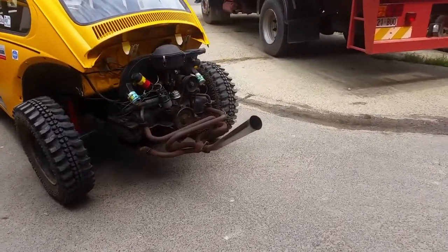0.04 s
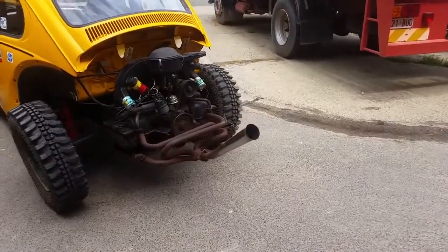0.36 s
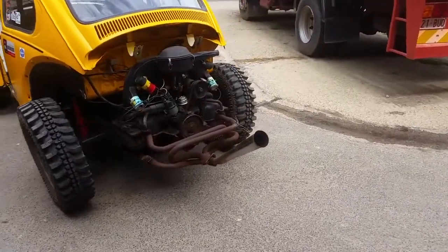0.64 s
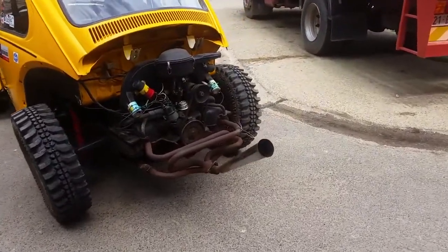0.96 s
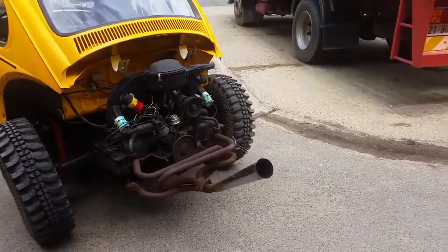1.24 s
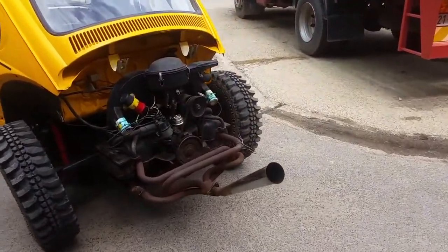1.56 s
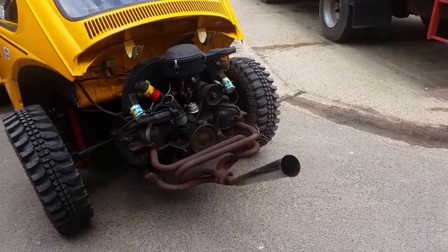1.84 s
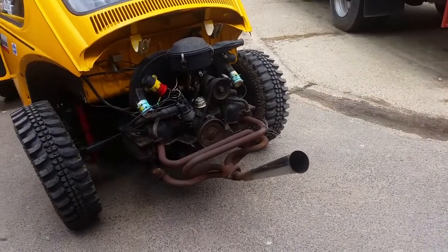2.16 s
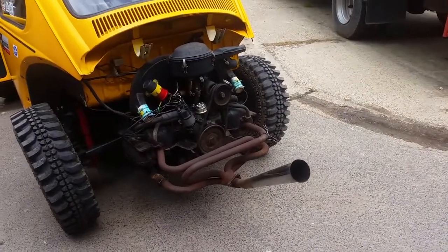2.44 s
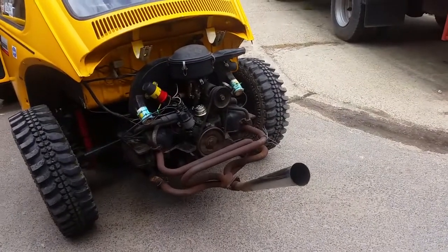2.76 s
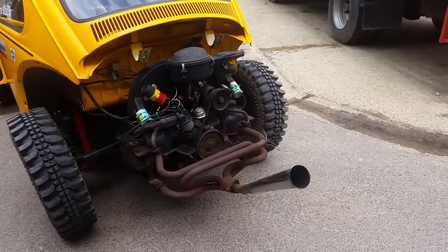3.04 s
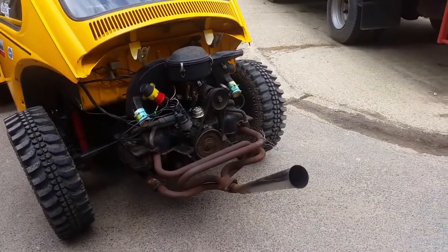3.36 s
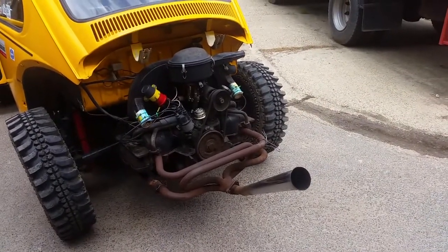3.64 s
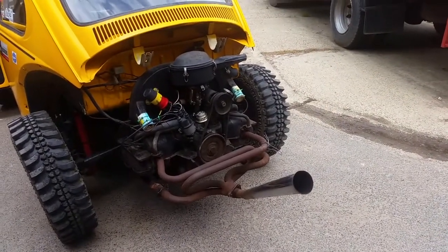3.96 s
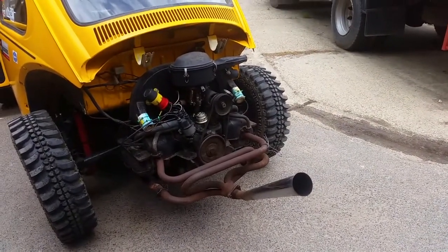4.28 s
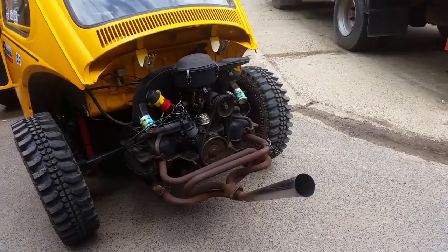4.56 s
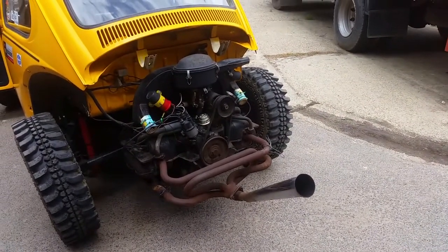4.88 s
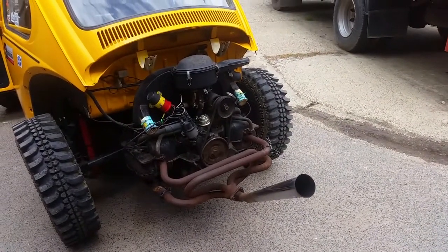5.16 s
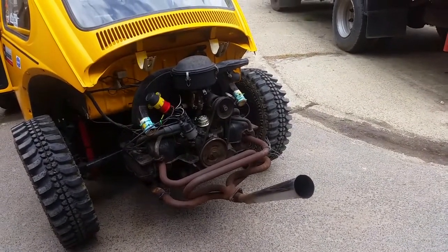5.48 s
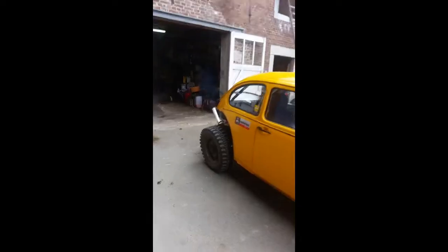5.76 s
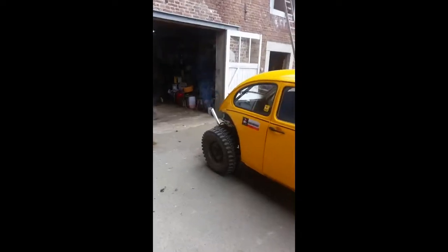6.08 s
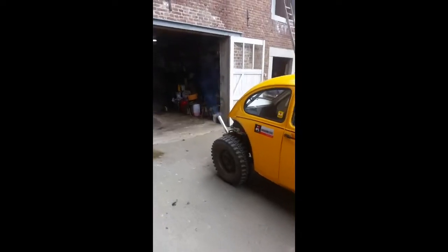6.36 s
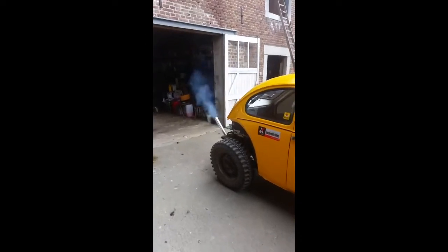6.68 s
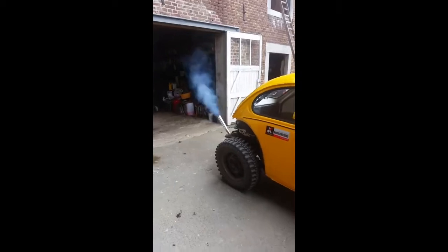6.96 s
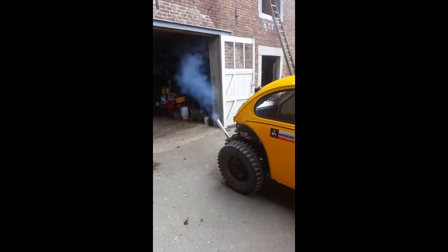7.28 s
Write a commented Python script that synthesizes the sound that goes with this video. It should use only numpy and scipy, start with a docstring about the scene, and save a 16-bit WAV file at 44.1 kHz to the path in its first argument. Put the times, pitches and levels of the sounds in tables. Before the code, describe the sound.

A small air-cooled car engine stutters in rapid popping bursts up close, then after a brief silence revs up farther away.

```python
"""A hard stutter close to the microphone: an air-cooled flat-four with an open megaphone exhaust,
firing about forty times a second in a yard. Each crank turn gives a sharp crack and, half a turn later,
a throaty bark as gas puffs ring the pipe; about every eighth turn the spark drops out.
After a short silence the engine is heard from farther off, before an open garage,
revving up until it bounces on its limiter."""
import sys
import numpy as np
from scipy import signal
from scipy.fft import rfft, irfft
from scipy.io import wavfile
from scipy.ndimage import uniform_filter1d

SR = 44100
rng = np.random.default_rng(int(sys.argv[2]) if len(sys.argv) > 2 else 0)


def int16_out(signal):
    """Quantize to a 16-bit WAV file."""
    q = np.round(np.clip(np.atleast_2d(signal).T, -1, 1) * 32767)
    wavfile.write(sys.argv[1], SR, q.astype(np.int16))


N = 327222
T = np.arange(N) / SR
BINS = np.fft.rfftfreq(8192, 1 / SR)


def amp(db):
    """Decibels to gain."""
    return 10 ** (np.asarray(db) / 20)


def unit(x):
    """Scales to rms 1."""
    return x / np.sqrt(np.mean(x ** 2) + 1e-20)


def curves(rows):
    """Each column of a time table, at every sample."""
    s, *columns = np.transpose(rows)
    return [np.interp(T, s, c) for c in columns]


def spectrum(points, hz=BINS):
    """Reads a table along a log-frequency axis."""
    f, value = np.transpose(points)
    return np.interp(np.log(hz + 1), np.log(f + 1), value)


def resonances(modes):
    """Gain of a set of steep-sided resonances."""
    return np.sqrt(sum((amp(db) / (1 + (2 * (BINS - hz) / width) ** 2)) ** 2 for hz, width, db in modes))


def colour(x, gain):
    """Minimum-phase filter of that shape; white noise keeps its power."""
    log_gain = np.log(np.maximum(gain / gain.max(), 1e-5))
    mirrored = np.concatenate([log_gain, log_gain[-2:0:-1]])
    taps = np.fft.ifft(np.exp(np.conj(signal.hilbert(mirrored)))).real[:len(BINS)]
    return signal.oaconvolve(x, taps / np.linalg.norm(taps))[:N]


def noise():
    """White noise."""
    return rng.standard_normal(N)


def wander(rate_hz):
    """Smooth random drift of rms 1."""
    lowpass = np.exp(-(np.fft.rfftfreq(N, 1 / SR) / rate_hz) ** 2)
    return unit(irfft(rfft(noise()) * lowpass, N))


def levelled(x, seconds):
    """Holds the running rms at 1."""
    return x / np.sqrt(abs(uniform_filter1d(x ** 2, int(seconds * SR))) + 1e-9)


def puffs(times, levels_db, rise, fall):
    """Envelope of gas puffs: the valve opens along a bell curve, then the pressure drains."""
    power = np.zeros(N)
    for s, db in zip(times, levels_db):
        part = slice(max(int((s - .02) * SR), 0), int((s + .12) * SR))
        t = T[part] - s
        power[part] += (amp(db) * np.exp(-(np.minimum(t, 0) / rise) ** 2 - np.maximum(t, 0) / fall)) ** 2
    return np.sqrt(power)


def echoes(x, t60, wet_db, delay):
    """Adds sparse reflections of random sign that die away."""
    t = T[:SR]
    taps = rng.choice([-1., 1.], SR) * (rng.random(SR) < 3000 / SR)
    taps *= (t > delay) * amp(-60 * t / t60)
    return x + amp(wet_db) * signal.oaconvolve(x, taps / np.linalg.norm(taps))[:N]


def microphones(source, likeness, balance, lag):
    """A stereo pair: the sides are partly alike, the right one later and duller."""
    hz, left, other = np.fft.rfftfreq(N, 1 / SR), rfft(source()), rfft(source())
    alike = np.clip(spectrum(likeness, hz), -1, 1)
    right = alike * left + 1j * np.sqrt(1 - alike ** 2) * other
    right *= amp(-spectrum(balance, hz)) * np.exp(-2j * np.pi * hz * lag)
    return irfft(np.array([left, right]), N)


def limiting(start_s=7.04):
    """0 while the speed is free, 1 once the limiter chops the spark."""
    return np.clip((T - start_s) / .012, 0, 1)


# Engine speed before the garage: t/s, firing rate/Hz
FIRING_RATE = [(5.94, 81.5), (6.03, 89.5), (6.09, 89.3), (6.184, 86.4), (6.33, 79.8), (6.394, 84.9),
               (6.506, 99.6), (6.698, 122.8), (6.866, 140.3), (6.96, 148.7), (7.08, 149.6), (7.21, 154.6),
               (7.294, 151.2), (7.42, 154.0)]
def firing_angle():
    """Count of firings during the rev-up; the limiter shakes the speed."""
    shake = (.005 + .02 * limiting()) * wander(25)
    return np.cumsum(curves(FIRING_RATE)[0] * (1 + shake)) / SR


def firings(angle, bank_db, cylinder_db=-14):
    """Pulse train; unequal banks and cylinders add half and quarter orders."""
    count = np.floor(angle)
    strength = 1 + amp(bank_db) * np.cos(np.pi * count) + amp(cylinder_db) * np.cos(np.pi / 2 * count)
    return unit(np.diff(count, prepend=0) * strength)


# Throttle blipped twice, then held open: t/s, relative level/dB of drone, blare, hiss
THROTTLE = [(5.88, -46, -48, -70), (5.96, -26.5, -27, -46), (6.02, -22, -26, -39.5), (6.10, -22, -28, -45),
            (6.20, -20.5, -17, -42), (6.32, -23.5, -24.5, -45), (6.39, -15, -16, -34.5),
            (6.51, -21, -18, -36), (6.62, -20, -14, -30.5), (6.84, -16.5, -18, -35), (7.0, -19.5, -15, -31),
            (7.10, -21.5, -15.5, -33), (7.23, -17.5, -15.5, -33.5), (7.42, -17.5, -17, -32)]
# The limiter cuts the spark, which returns with a bang: cut t/s, return t/s, relative bang level/dB
SPARK_CUTS = [(7.055, 7.136, -12.5), (7.22, 7.316, -15.5)]
def load():
    """Drone, blare and hiss in dB follow the throttle; blare and hiss sag while the spark is cut."""
    cut = sum(np.clip((T - start) / .024 + .5, 0, 1) * np.clip((end - T) / .0057, 0, 1)
              for start, end, _ in SPARK_CUTS)
    drone_db, blare_db, hiss_db = curves(THROTTLE)
    return drone_db, blare_db - 4 * cut, hiss_db - 4.5 * cut


# Gas hiss from a distance: f/Hz, relative level/dB
FAR_HISS = [(1500, -1.5), (2800, 4), (4000, -1.5), (5500, -5.5), (7500, -4), (10000, -7.5), (13000, -6),
            (16000, -11)]
# Low and high pipe resonances from a distance: f/Hz, width/Hz, relative level/dB
FAR_HEADERS = [(153, 88, -10), (280, 150, 7), (365, 230, 2.5)]
FAR_MEGAPHONE = [(602, 180, -6), (696, 105, -0.5), (772, 66, 0.5), (924, 100, -5), (1185, 340, -10),
                 (1760, 600, -13.5), (2085, 480, -13.5), (2780, 6700, -33)]
def revving_exhaust(angle):
    """Firing pulses and pulsing gas noise ring the pipe, smeared by the walls around the garage."""
    drone_db, blare_db, hiss_db = load()
    flow = unit(.5 + np.exp(-(angle % 1) / .51))
    # share of noise: it burbles when slow, clears when fast, breaks up on the limiter
    rough = np.interp(curves(FIRING_RATE)[0], [85, 115], [.86, .74]) + .21 * limiting()
    drive = amp(-7) * firings(angle, bank_db=-5) + 1.3 * rough * flow * noise()
    drone = colour(drive, resonances(FAR_HEADERS))
    drone = levelled(echoes(drone, t60=.12, wet_db=3, delay=.003), seconds=.06)
    horn = resonances(FAR_MEGAPHONE)
    pulses = echoes(firings(angle, bank_db=-2), t60=.09, wet_db=10, delay=.001)
    note = levelled(colour(pulses, horn), seconds=.044)
    roar = colour(flow * noise(), horn * amp(spectrum([(700, -7), (1300, 2.5), (2500, -14)])))
    smeared = unit(echoes(roar + 1.04 * note, t60=.3, wet_db=10.5, delay=.0074))
    blare = np.sqrt(1 - rough ** 2) * note + rough * smeared
    hiss = colour(flow * noise(), amp(spectrum(FAR_HISS)))
    hiss = unit(echoes(hiss, t60=.47, wet_db=4, delay=.0094))
    _, returns, bang_db = np.transpose(SPARK_CUTS)
    bangs = puffs(returns, bang_db, rise=.003, fall=.04) * (1.2 * note + roar + .19 * hiss)
    return amp(drone_db - 4.5) * drone + amp(blare_db - .05) * blare + amp(hiss_db + 9.5) * hiss + bangs


# How strongly the pipe radiates a clean harmonic: f/Hz, relative level/dB
PIPE_RESPONSE = [(80, -3.5), (86, 2.5), (95, 4), (104, 0), (120, -2), (150, -2), (178, -4.5), (205, 2),
                 (275, 2), (310, 2), (350, -6.5), (460, -10), (620, -19)]
# Clean partials: multiples of the firing rate
ORDERS = [.5, 1, 1.5, 2, 2.5, 3, 4]
# Unequal banks bring out the half orders with speed: relative level/dB when slow, when fast
HALF_ORDER_LEVELS = [-18, -13.5]
def firing_tone(angle):
    """The clean low orders swell and fade as they climb through the pipe's response."""
    rate = curves(FIRING_RATE)[0]
    half_db = np.interp(rate, [95, 145], HALF_ORDER_LEVELS)
    tones = 0
    for k in ORDERS:
        db = spectrum(PIPE_RESPONSE, k * rate) - 2.1 * (k - 1) + half_db * (k % 1 > 0)
        tones += amp(db + 2 * wander(23)) * np.sin(2 * np.pi * k * angle)
    return amp(load()[0] + 2) * tones * (1 + .25 * wander(26))


def howl(angle, hz, width):
    """Each crank order sings out as it climbs through the main resonance of the pipe."""
    rate = curves(FIRING_RATE)[0]
    orders = 0
    for k in range(8, 20):
        detuning = 2 * (k * rate / 2 - hz) / width
        orders += np.sin(np.pi * k * angle + rng.uniform(0, 2 * np.pi)) / (1 + detuning ** 2)
    db = load()[1] + np.interp(rate, [88, 108], [-9, -2]) - 7 * limiting()
    return levelled(orders, seconds=.05) * amp(db)


# Microphones well back from the garage: f/Hz, left minus right level/dB
FAR_TILT = [(60, 10), (110, -8), (200, -2.5), (380, 2.5), (700, 6), (1290, 2.5), (2380, 0.5), (4400, 0.5),
            (8120, 17), (15000, 7.5)]
# The same pair: f/Hz, left-right correlation
FAR_LIKENESS = [(60, -0.34), (130, 1), (290, 0.22), (640, 0.62), (1410, 0.64), (3100, -0.58), (6820, 0.11),
                (15000, -0.74)]
def far_engine():
    """The rev-up from farther off; its clean note dips at each cut and flutters on the limiter."""
    angle = firing_angle()
    stumble = sum(np.exp(-((T - cut) / .01) ** 2) for cut, _, _ in SPARK_CUTS)
    chop = amp(-3 * stumble + 3.1 * limiting() * wander(25))
    exhaust = microphones(lambda: revving_exhaust(angle), FAR_LIKENESS, FAR_TILT, lag=.00007)
    return exhaust + firing_tone(angle) * chop + howl(angle, hz=729, width=87) * amp([[1], [-2]])


# Runs of firings in the yard, between cuts or misfires (a lone pop starts and ends at once):
# first crack t/s, last crack t/s, mid-run lag/s as the speed shifts, relative level/dB of fizz, rasp, bark
FIRING_RUNS = [(0.072, 0.17, -0.0033, -20.5, -15, -19.5), (0.22, 0.22, 0, -26, -21.5, -23),
               (0.27, 0.37, 0, -16.5, -17, -20), (0.42, 0.42, 0, -29.5, -26.5, -29.5),
               (0.472, 0.770, -.001, -17.5, -17, -21.5), (0.869, 1.016, 0.0025, -20, -16, -20.5),
               (1.12, 1.178, 0, -17, -16.5, -44.5), (1.288, 1.288, 0, -16, -19.5, -34),
               (1.338, 1.574, .002, -20.5, -19, -23), (1.669, 1.968, -0.0052, -21, -18.5, -23),
               (2.074, 2.373, .003, -21, -20, -22.5), (2.472, 2.768, -0.0012, -21, -18.5, -21),
               (2.866, 3.167, 0.0013, -20.5, -19.5, -21), (3.263, 3.561, -0.001, -21, -19, -21.5),
               (3.659, 3.952, .002, -20, -20, -21.5), (4.05, 4.339, 0.0011, -19, -19, -22.5),
               (4.437, 4.737, -0.0032, -20, -17.5, -22), (4.841, 5.134, 0.0043, -21.5, -19, -23),
               (5.231, 5.431, 0.0016, -21.5, -20, -20.5), (5.478, 5.478, -0.0097, -27, -19, -39)]
def turns(turn_s=.0494):
    """Every fired turn: t/s, turns into its run, place 0-1 in the run, fizz, rasp and bark level/dB."""
    rows = []
    for first, last, lag, *levels_db in FIRING_RUNS:
        for k, place in enumerate(np.linspace(0, 1, round((last - first) / turn_s) + 1)):
            s = first + (last - first) * place + lag * np.sin(np.pi * place)
            rows.append((s, k, place, *levels_db))
    return np.transpose(rows)


def charges():
    """Time and levels of each fired turn: no two burn alike, and a crack that fizzes more rasps less."""
    s, k, place, fizz_db, rasp_db, bark_db = turns()
    sharpness, strength = rng.standard_normal((len(s), 2)).T
    rich = np.exp(-(k / 1.2) ** 4)  # the first charges after a cut burn rich: less fizz
    sharp_db = 1.53 * sharpness + .47 * (.5 - 2 * rich)
    arch_db = np.sin(np.pi * place) - .5  # the bark is fullest in mid-run
    return s, fizz_db + sharp_db, rasp_db - .84 * sharp_db, bark_db + arch_db + .93 * strength


def crank():
    """Crank angle in turns: whole at each crack, counting on through the unfired turns."""
    s = turns()[0]
    period = np.median(np.diff(s))
    count = np.concatenate([[0], np.cumsum(np.round(np.diff(s) / period))])
    return np.interp(T, s, count) + (T - np.clip(T, s[0], s[-1])) / period


def coasting():
    """0 while the engine fires, 1 once a turn has gone by unfired."""
    s = turns()[0]
    since = T - s[np.maximum(np.searchsorted(s, T) - 1, 0)]
    return uniform_filter1d(np.clip((since - .048) / .054, 0, 1), size=500)


# Microphone position: t/s, share 0-1 of the sound from in front of the pipe mouth rather than beside it
MIC_FACING = [(0, 0.32), (1.0, 0.21), (1.6, 0.76), (2.3, 0.99), (5.5, 0.98)]
def pipe(drive, beside, facing):
    """The pipe's colour shifts as the microphone comes round to its mouth."""
    share = curves(MIC_FACING)[0]
    side, front = colour(drive, resonances(beside)), colour(drive, resonances(facing))
    return np.sqrt(1 - share) * side + np.sqrt(share) * front


# Treble close up, shared by the rush and the gas jet of each crack: f/Hz, relative level/dB
NEAR_HISS = [(3000, -24), (4400, -4), (5000, -7), (6100, 6.5), (7400, -4.5), (8600, 2), (9800, 3),
             (11000, 1), (13000, 1.5), (14500, -4), (16000, -12)]
def fan_rush():
    """Grainy rush of fan and valve gear, louder for the first instant, then steady."""
    clatter = colour(noise() * amp(3.7 * wander(250) - 1.5), amp(spectrum(NEAR_HISS)))
    return np.interp(T, [0, .07, .15], amp([-31, -37, -45])) * clatter


# Low end close to the pipe: t/s, relative level/dB of throb, drone
LOW_END = [(0.0, -22.5, -25), (0.9, -27.5, -27), (1.2, -26, -29), (1.6, -24.5, -26), (2.05, -29, -32),
           (2.4, -28, -28.5), (4.4, -27, -30), (5.5, -28, -31)]
# Header resonances from beside and in front: f/Hz, width/Hz, relative level/dB
HEADERS_SIDE = [(154, 85, -7.5), (281.6, 23, 6), (359, 44, -4)]
HEADERS_FRONT = [(156, 150, -12), (267.4, 31, 4), (284, 45, -6.5), (351.4, 57, 0)]
def header_drone():
    """Every exhaust stroke knocks the headers into a low ring that swells and fades."""
    angle = crank()
    strokes = np.floor(2 * (angle - .44))
    knocks = unit(np.diff(strokes, prepend=strokes[0]))
    ring = levelled(pipe(knocks + .8 * noise(), HEADERS_SIDE, HEADERS_FRONT), seconds=.07)
    level_db = curves(LOW_END)[1] - 1 + 2.5 * curves(MIC_FACING)[0] - 8 * coasting()
    swell_db = 2.22 * np.cos(2 * np.pi * (angle - .55)) + 1.8 * wander(12)
    return ring * amp(level_db + swell_db)


def throb():
    """Gas pumped out twice a turn, with an extra pressure slug from each fired cylinder."""
    s = turns()[0]
    pumping = -np.cos(4 * np.pi * (crank() - .41)) * amp(6 - 13 * coasting())
    slugs = puffs(s + .001, np.full_like(s, -.5), rise=.0027, fall=.0048)
    slugs += puffs(s + .0221, np.full_like(s, 14), rise=.012, fall=.0054)
    slugs = signal.sosfilt(signal.butter(2, 32, "high", fs=SR, output="sos"), slugs)
    uneven = -amp(-5.5) * np.cos(6 * np.pi * (crank() - .06))  # the two banks push unequally
    rumble = colour(noise(), resonances([(85.6, 130, 0)]))
    pressure = amp(curves(LOW_END)[0]) * (pumping + uneven - slugs + amp(-10) * rumble)
    # an open pipe hardly radiates below the firing rate
    return signal.sosfiltfilt(signal.butter(4, 30, "high", fs=SR, output="sos"), pressure)


# Megaphone resonances from beside and in front: f/Hz, width/Hz, relative level/dB
MEGAPHONE_SIDE = [(485, 124, -4), (700, 180, -4), (866, 96, 0), (1201, 41, 2), (1361, 216, 3),
                  (1820, 290, -16), (2320, 160, -19), (2410, 350, -2), (2946, 280, -9), (5200, 6800, -22.5)]
MEGAPHONE_FRONT = [(614, 98, -1), (697.4, 32, -1.5), (899, 118, -0.5), (980, 100, -5.5), (1243, 64, -4),
                   (1425, 230, 2.5), (1714, 160, 1), (2118, 295, 2), (2685, 570, -5), (3450, 1470, -15.5),
                   (6860, 4100, -28)]
def bark(s, fizz_db, bark_db):
    """The blowdown rings the megaphone: briefly at each crack, fully half a turn later."""
    blow = puffs(s + .022, bark_db + 1.5, rise=.0075, fall=.011)
    blow += puffs(s, fizz_db - 5, rise=.0017, fall=.0056)
    flow = np.interp(T, [0, .06, .12], amp([-24, -29, -36]))
    gas = noise() * amp(3.1 * wander(576) + .5)  # it tears into lumps as it leaves the valve
    return pipe((blow + flow) * gas, MEGAPHONE_SIDE, MEGAPHONE_FRONT)


def swirl(x, depth, delay, spread):
    """The jet leaves each crack in another shape: a short echo whose delay changes from turn to turn."""
    turn = np.floor(crank() + .13).astype(int)
    lags = (delay + spread * rng.random(256)[turn % 256]) * SR
    echo = np.interp(np.arange(N) - lags, np.arange(N), x)
    return (x + depth * echo) / np.sqrt(1 + depth ** 2)


# Rasp resonances from beside and in front: f/Hz, width/Hz, relative level/dB
RASP_SIDE = [(2430, 160, 6.5), (2717, 330, -4.5), (3330, 230, -29), (4090, 1120, -5), (5630, 900, -8)]
RASP_FRONT = [(2090, 324, 1), (2385, 180, 0), (2767, 116, 3), (2975, 570, 0), (3707, 635, -1.5)]
def crack(s, fizz_db, rasp_db):
    """A sharp jet of gas fizzes and sets the pipe's high resonances rasping."""
    jet = colour(noise() * amp(1.95 * wander(900)), amp(spectrum(NEAR_HISS)))
    fizz = puffs(s + .00027, fizz_db + 4, rise=.0034, fall=.0054) * jet
    gas = puffs(s - .0005, rasp_db + 3, rise=.0039, fall=.011) * noise()
    return swirl(fizz + pipe(gas, RASP_SIDE, RASP_FRONT), depth=.6, delay=.0003, spread=.0012)


def stutter():
    """Cracks and barks over the header drone and the fan; the yard answers."""
    s, fizz_db, rasp_db, bark_db = charges()
    cracks, barks, drone = crack(s, fizz_db, rasp_db), bark(s, fizz_db, bark_db), header_drone()
    treble = echoes(cracks + fan_rush(), t60=.23, wet_db=-12, delay=.0073)
    return treble + echoes(barks, t60=.24, wet_db=-10, delay=.0036) + drone


# Microphones close beside the car: f/Hz, left minus right level/dB
NEAR_TILT = [(180, 0.96), (380, 1.8), (700, 2.8), (1290, 4.9), (2380, 12.1), (4400, 2.2), (8120, 17.7),
             (15000, 15)]
# The same pair: f/Hz, left-right correlation
NEAR_LIKENESS = [(100, 0.79), (300, 0.92), (650, 0.83), (1400, 0.58), (3000, 0.18), (7000, 0.037),
                 (15000, .1)]
def near_engine():
    """At close range the stutter leans left and the throb sits in the centre."""
    return microphones(stutter, NEAR_LIKENESS, NEAR_TILT, lag=.00009) + throb()


def scene(near_end_s=5.492, far_start_s=5.88):
    """The close stutter, a silence, then the rev-up from farther off."""
    near = near_engine() * np.clip((near_end_s - T) / .016, 0, 1)
    far = far_engine() * np.clip((T - far_start_s) / .03, 0, 1)
    return near + far


def record(dry):
    """The loudest peaks are rounded off; the treble ends at 16 kHz."""
    rounded = dry / (1 + dry ** 6) ** (1 / 6)
    lowpass = signal.firwin(401, 16000, window=("kaiser", 8), fs=SR)
    return signal.oaconvolve(rounded, lowpass[None], "same")


dry = scene()
out = record(dry)
int16_out(out)
```